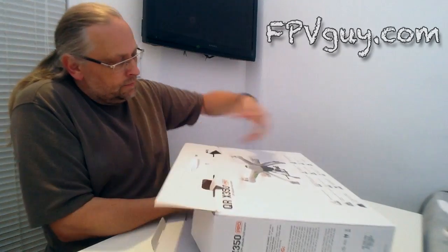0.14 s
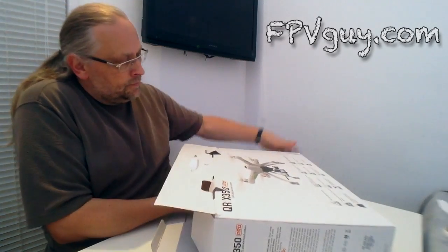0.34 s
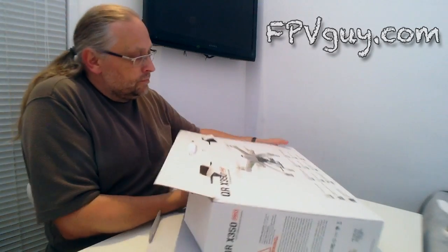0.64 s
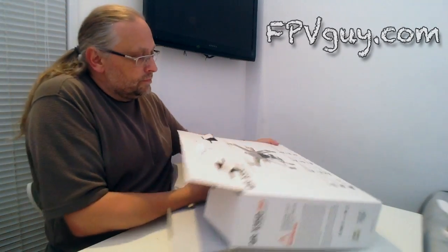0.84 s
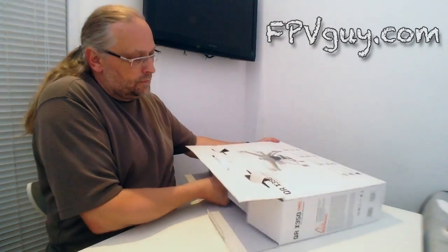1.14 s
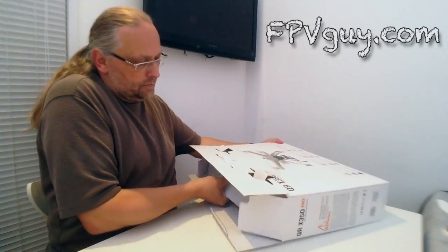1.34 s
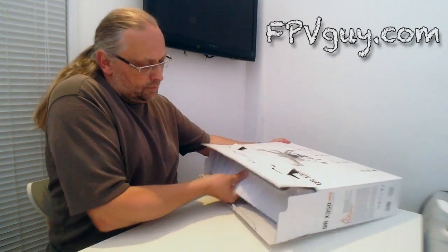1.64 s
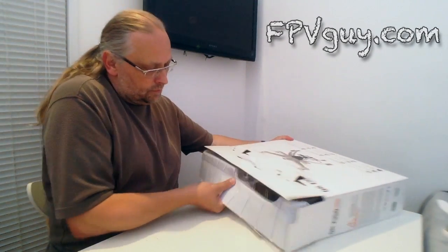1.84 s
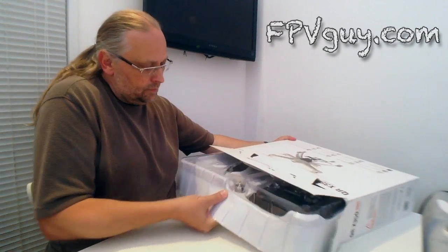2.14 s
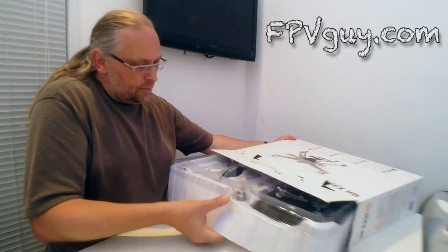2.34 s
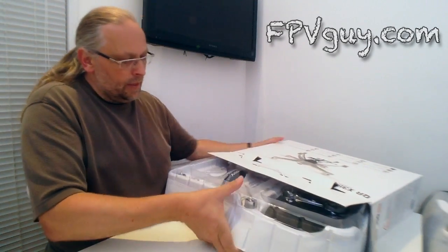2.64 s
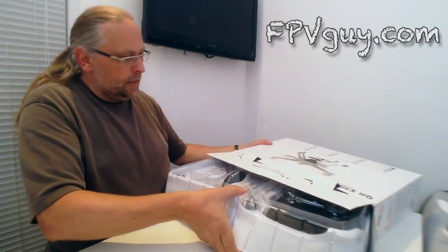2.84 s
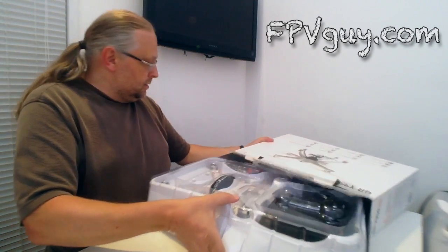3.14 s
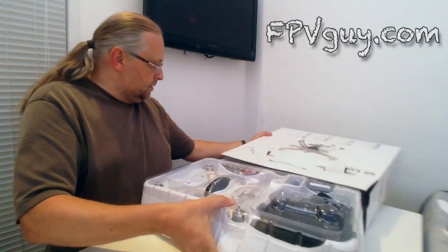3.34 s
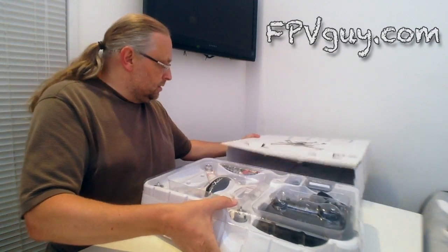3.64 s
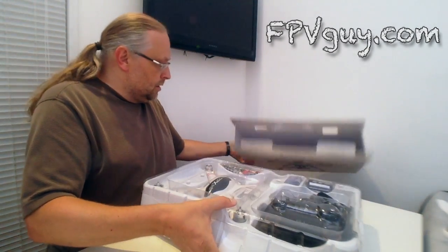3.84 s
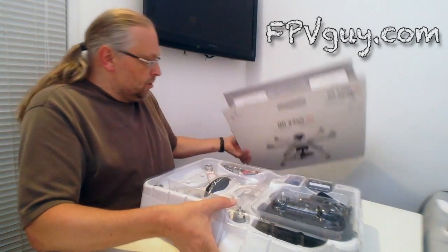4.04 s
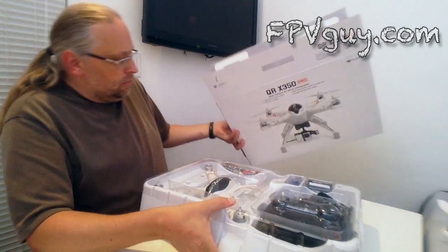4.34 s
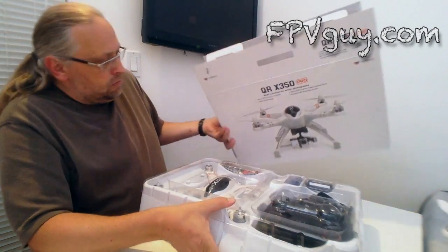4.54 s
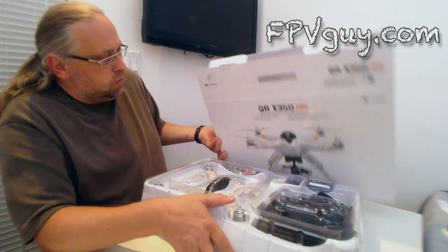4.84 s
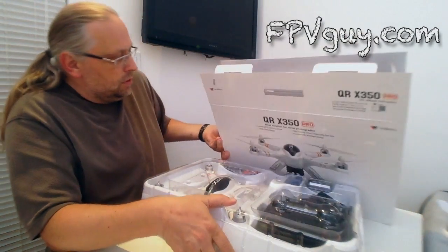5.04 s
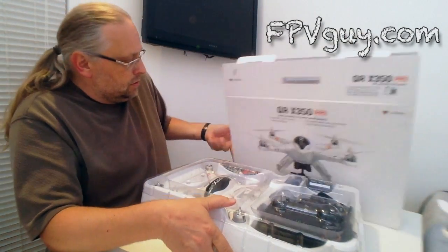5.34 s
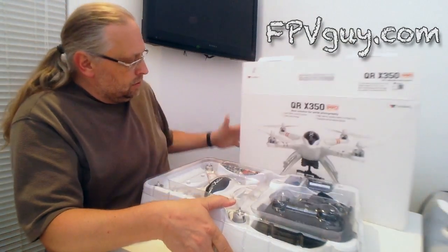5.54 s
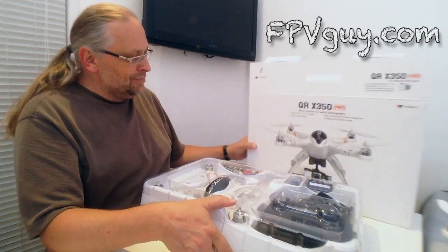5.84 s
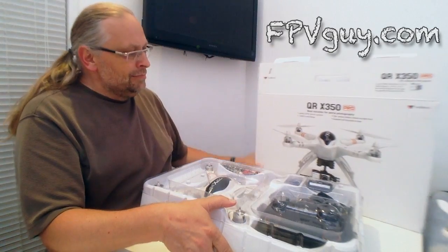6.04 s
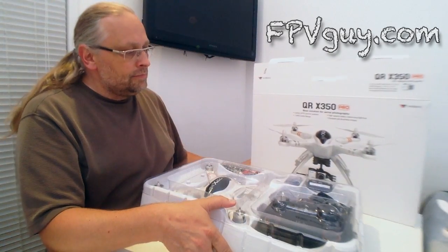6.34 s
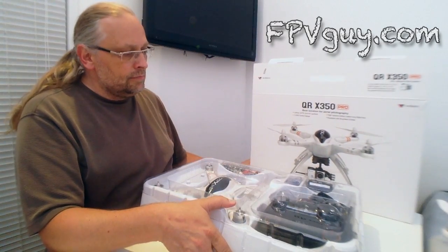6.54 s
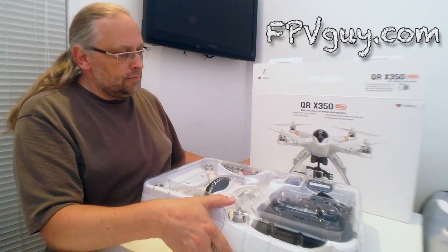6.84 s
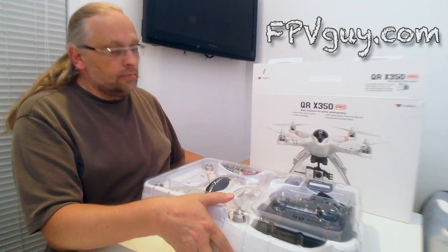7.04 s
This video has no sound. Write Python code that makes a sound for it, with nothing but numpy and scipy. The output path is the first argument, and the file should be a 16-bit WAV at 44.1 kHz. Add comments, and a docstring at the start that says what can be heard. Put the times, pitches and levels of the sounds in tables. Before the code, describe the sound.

Close unboxing sounds at a table, heard by one microphone in a bare, lightly echoing room: sharp cardboard knocks first, then a tray scraping out in two hard stick-slip drags, with snags, ticks and loud card pops. A brief lull with light brushing follows, then loud hollow box thumps, softer settling knocks, a short bright skin-on-card hiss, and finally low hum with barely audible rustles.

```python
"""A table in a small, bare room, picked up by one microphone: hands brush and knock a cardboard box.
A plastic tray is dragged out in two hard pulls; stick-slip noise rasps, hisses and drums on the hollow box.
Card catches, ringing as damped modes, and snaps and ticks in noise bursts; its walls thud as low tones.
The empty box is lifted and knocked upright on the table, and a hand slides off it in a bright hiss.
Mains hum, made of wavering tones, and shaped room noise lie under it all."""
import sys
import numpy as np
from scipy import signal
from scipy.fft import rfft, irfft, next_fast_len
from scipy.io import wavfile
from scipy.ndimage import map_coordinates

SR = 44100
rng = np.random.default_rng(int(sys.argv[2]) if len(sys.argv) > 2 else 0)


def int16_out(signal):
    """Quantize to a 16-bit WAV file."""
    q = np.round(np.clip(np.atleast_2d(signal).T, -1, 1) * 32767)
    wavfile.write(sys.argv[1], SR, q.astype(np.int16))


N = 316637

# the tray slides out of its box, levels ahead of each kind of slip's share:
# (t/s, friction level/dB, panel drumming level/dB)
TRAY_PULL = [(0.9, -53, -50), (1.12, -46.5, -37.5), (1.35, -42, -35.5), (1.57, -47, -38.5),
             (1.67, -32.5, -34), (1.77, -34.5, -29.5), (1.81, -27, -22.5), (1.9, -28.5, -33.5),
             (1.97, -25, -28.5), (2.04, -38, -33), (2.23, -39.5, -34), (2.32, -35.5, -25.5),
             (2.42, -41, -42.5), (2.6, -42, -31.5), (2.72, -41.5, -36), (2.85, -46.5, -45),
             (2.92, -44.5, -32), (3.08, -39.5, -28.5), (3.151, -27.5, -16), (3.21, -25.5, -15.5),
             (3.26, -24.5, -23.5), (3.31, -24, -18.5), (3.39, -28.5, -22), (3.441, -37, -31.5),
             (3.56, -35.5, -28), (3.72, -56, -44.5), (3.881, -57.5, -49)]


def knocks(hollow_db=2):
    """Each blow sounds into the room, and the air inside the box rings on."""
    # card and tray catch or strike; snap and edge levels are rms ahead of their envelopes:
    # (t/s, knock peak level/dB, panel f/Hz, snap level/dB, crisp edge level/dB, base panel t60/s)
    contacts = [(0.052, -20.5, 512, -42, -43, 0.018), (0.307, -23.5, 793, -42, -34.5, 0.0097),
                (0.56, -20.5, 562, -24, -25, 0.023), (0.5744, -9, 600, -8, -11.5, .029),
                (0.644, -6, 600, -8, -23.5, 0.021), (0.953, -24.5, 846, -37, -38, .035),
                (1.101, -17.5, 503, -24, -29.5, 0.041), (1.124, -15, 730, -48, -35, 0.04),
                (1.511, -21.5, 744, -36, -52, .039), (1.794, -31, 512, -33, -12.5, 0.031),
                (1.832, -18.5, 580, -22, -16, 0.024), (1.865, -14, 648, -24, -25.5, 0.043),
                (1.987, -14, 734, -40, -19, 0.02), (2.049, -17, 708, -28, -46.5, .06),
                (2.081, -17, 711, -40, -38, .08), (2.2652, -7.5, 670, -7.5, -14, 0.011),
                (2.484, -22.5, 560, -26.5, -21.5, 0.025), (2.579, -9, 575, -14.5, -25.5, 0.043),
                (2.638, -6, 644, -16, -26.5, 0.033), (2.678, -6.5, 816, -9.5, -32.5, 0.032),
                (2.937, -17.5, 940, -40, -42.5, 0.033), (3.025, -18.5, 904, -31, -48, .022),
                (3.094, -13.5, 657, -37, -26.5, 0.02), (3.118, -17, 610, -30, -34, .04),
                (3.311, -7.5, 582, -29, -27.5, 0.039), (3.563, -18.5, 467, -46, -24.5, .09),
                (4.464, -21, 407, -37, -44, 0.039), (4.707, -2.5, 517, -13.5, -25, 0.022),
                (4.75, -10.5, 605, -19, -26.5, .05), (4.981, 2, 621, -29, -25.5, 0.061),
                (4.988, -2, 739, -17.5, -27, 0.074), (5.365, -22, 610, -39, -48, 0.048),
                (5.38, -8.5, 353, -35, -38.5, .018), (5.593, -12, 320, -40, -40, 0.038),
                (5.902, -9, 392, -32, -34.5, 0.018), (5.995, -11.5, 382, -39, -32, 0.061)]
    # resonances of the air in the box: (f/Hz, width/Hz, relative level/dB)
    cavity = [(166, 9.1, 5), (289.5, 22, 1.5), (377, 7.6, -12.5), (442, 6.6, 2.5), (493, 4.1, -2.5),
              (700, 13, 2), (725, 3.5, -1.5), (874, 6.4, 1), (933, 10, 6), (1170, 7.4, -9),
              (1360, 3.2, -0.5), (1500, 21, -8.5), (1720, 58, -10), (2500, 24, -3)]
    out, blows = np.zeros(N), np.zeros(N)
    for s, *contact in contacts:
        ring, crack = blow(*contact)
        add(blows, s, ring + crack)
        add(out, s, room(ring, wet_db=-1.5) + room(crack, wet_db=-2))
    return out + amp(hollow_db) * resonate(blows, cavity)


def blow(db, hz, snap_db, edge_db, t60):
    """One contact: the ring of a well-damped panel, and the crunch of the creased card."""
    # modes of a card panel: (multiple of its pitch, relative level/dB, share of the ring time)
    panel = [(0.361, -13.5, 1.5), (.53, -3.5, 1.04), (0.693, -0.5, 0.96), (0.847, 1.5, 1.07),
             (1.001, 5.5, 0.78), (1.191, 1, 0.68), (1.419, -1, 0.62), (1.741, -10, 0.84), (2.2, -21.5, 1.2),
             (2.901, -25.5, 0.61)]
    # spectrum of the snapping card: (f/Hz, relative level/dB)
    snap_spectrum = [(250, -33), (700, 4), (1200, 14.5), (1750, 11.5), (2200, 6.5), (2650, 4.5), (3900, -2),
                     (6500, -14.5), (15000, -63.5)]
    # spectrum of the crisp edge: (f/Hz, relative level/dB)
    edge_spectrum = [(1500, -63.5), (3500, 4), (5000, 2.5), (6500, 1), (8000, 6), (9300, 1.5), (10600, -9),
                     (12500, -6), (16000, -30)]
    t = np.arange(SR // 5) / SR
    ring = np.zeros(len(t))
    for k, (ratio, level, life) in enumerate(panel):
        level_chance, pitch_chance = rng.standard_normal(2)  # no two blows excite the modes alike
        mode_hz = hz * ratio * (1 + 0.033 * pitch_chance)
        mode = np.sin(2 * np.pi * mode_hz * t) * fade(t, t60 * life)
        ring += (-1) ** k * amp(level + level_chance) * mode
    snap = crunch(t, snap_spectrum, t60=0.024, rise=0.00073)
    edge = crunch(t, edge_spectrum, t60=0.034, rise=0.00062)
    return amp(db) * ring / np.max(np.abs(ring)), amp(snap_db) * snap + amp(edge_db) * edge


def crunch(t, spectrum, t60, rise):
    """A short burst of coloured noise: fibres giving way."""
    return coloured(rng.standard_normal(len(t)), spectrum) * fade(t, t60) * (1 - np.exp(-t / rise))


def sliding():
    """Coarse slips drum on the hollow box, finer ones rasp, and the flat faces hiss."""
    # resonances of the hollow box: (f/Hz, width/Hz, relative level/dB)
    box = [(90, 52, -10), (172, 70, -3), (285.5, 57, 2.5), (373, 64, 1), (496, 91, -1), (670, 145, -2.5),
           (786, 85, 0.5), (985, 270, -7.5)]
    # spectrum of the rasp: (f/Hz, relative level/dB)
    rasp_spectrum = [(500, -32.5), (1000, -8.5), (1400, 1.5), (2200, -1), (3600, 0), (5000, -2.5),
                     (9000, -36)]
    # spectrum of the hiss: (f/Hz, relative level/dB)
    hiss_spectrum = [(2000, -38), (3700, -6), (4800, -3), (6200, 1), (7800, 5), (9000, 0.5), (10200, -7.5),
                     (12000, -2.5), (15500, -14.5)]
    drum_share_db, rasp_share_db, hiss_share_db = -0.5, -2.5, -0.5
    drum_gain, rasp_gain, hiss_gain = rubbing()
    judder = wobble(70)  # the pressure of the hand is never even
    drum = unit(resonate(slips(rate=380, smooth=0.69), box))
    rasp = coloured(slips(rate=450, smooth=1.0), rasp_spectrum)
    hiss = coloured(slips(rate=900, smooth=1.7), hiss_spectrum)
    drum *= drum_gain * amp(drum_share_db + 0.92 * judder)
    rasp *= rasp_gain * amp(rasp_share_db + 1.4 * judder)
    hiss *= hiss_gain * amp(hiss_share_db + 0.55 * judder)
    return room(drum + rasp + hiss, wet_db=-9.5)[:N]


def rubbing():
    """Gains of drumming, rasp and hiss: pull and brushes add in power; brightness trades rasp for hiss."""
    # hands, sleeves and flaps brush the card, levels ahead of each kind of slip's share:
    # (t/s, length/s, friction level/dB, brightness/dB, panel drumming level/dB)
    brushes = [(-0.03, 0.16, -43, -0.5, -36.5), (0.16, 0.24, -58, 0, -45), (0.431, 0.12, -50, -1, -38.5),
               (0.59, 0.084, -38, -4, -29.5), (0.76, 0.13, -46.5, 3, -54.5), (0.909, 0.27, -45, 4, -38.5),
               (2.417, 0.02, -39, 8, -42), (3.87, 0.12, -52, 4.5, -46), (3.97, 0.059, -43.5, 1.5, -36),
               (4.047, 0.37, -61, 1.5, -46), (4.423, 0.023, -43.5, 0, -34),
               (4.594, 0.22, -60.5, -1.5, -46.5), (4.723, 0.11, -48, 1.5, -33),
               (4.9, 0.093, -41, 0.5, -33.5), (4.99, 0.027, -50, -5.5, -21), (5.25, 0.69, -60.5, 0.5, -50),
               (5.354, 0.047, -53.5, 3, -34), (5.657, 0.2, -51.5, 2, -40.5), (5.889, 0.11, -40.5, -1, -26),
               (6.15, 0.3, -51.5, 0.5, -52.5), (6.63, 0.21, -61.5, 0.5, -52),
               (6.916, 0.38, -67.5, 0, -57.5)]
    friction_db, drum_db = curves(TRAY_PULL)
    power = amp([drum_db, friction_db, friction_db]) ** 2
    for s, length, db, bright_db, drumming_db in brushes:
        shares = amp([[drumming_db], [db - bright_db], [db + bright_db]])
        power += (shares * stroke(s, length, attack=0.031, release_db_per_s=115.5)) ** 2
    return np.sqrt(power)


def slips(rate, smooth):
    """Friction: tiny stick-slip jolts of uneven size, rate a second on average, over a smooth rub."""
    happens = rng.random(N) < rate / SR
    sizes = amp(3 * np.clip(rng.standard_normal(N), -2, 2))
    jolts = happens * rng.choice([-1, 1], N) * sizes
    return unit(unit(jolts) + smooth * rng.standard_normal(N))


def stroke(s, length, attack, release_db_per_s):
    """Gain of one stroke of the hand: it swells over the attack and dies away once length has passed."""
    t = np.arange(N) / SR - s
    swell = np.sin(np.pi / 2 * np.clip(t / attack, 0, 1)) ** 2
    return swell * amp(-release_db_per_s * np.maximum(t - length, 0))


def catches(count=30, scatter_db=2, spread_octaves=0.32):
    """The moving tray snags lightly at random moments, as hard as it is being pulled."""
    knock_over_drumming_db, snap_over_friction_db, panel_hz = -3, 0.5, 710
    out = np.zeros(N)
    times, friction, drumming = np.transpose(TRAY_PULL)
    for s in rng.uniform(times[0], times[-1], count):
        size, pitch = rng.standard_normal(2)
        knock_db = np.interp(s, times, drumming) + knock_over_drumming_db + scatter_db * size
        snap_db = np.interp(s, times, friction) + snap_over_friction_db + scatter_db * size
        hz = panel_hz * 2 ** (spread_octaves * pitch)
        ring, crack = blow(knock_db, hz, snap_db, snap_db, t60=0.027)
        add(out, s, ring + crack)
    return room(out, wet_db=-5.5)[:N]


def thuds():
    """The broad walls of the box flex: two low partials that swing and die away."""
    # a whole wall flexes: (t/s, lower partial's level ahead of its envelope/dB, f/Hz)
    wall_flexes = [(0.053, -25, 153), (0.502, -23, 96), (0.574, -18, 245), (0.953, -24, 190),
                   (1.126, -33, 126), (1.393, -29, 155), (2.267, -15, 241), (2.676, -23, 160),
                   (3.181, -16, 287), (3.842, -27.5, 120), (4.469, -32, 146), (4.709, -19, 310),
                   (4.879, -13.5, 80.5), (4.992, -9, 156), (4.996, -9.5, 90.8), (5.383, -12.5, 88),
                   (5.599, -13.5, 166), (5.718, -19.5, 121), (5.74, -19.5, 88.4), (5.905, -6.5, 85.5),
                   (5.915, -14.5, 202), (5.994, -12, 376.4)]
    out, t = np.zeros(N), np.arange(SR // 2) / SR
    envelope = fade(t, t60=0.12) * (1 - np.exp(-t / 0.0051))
    for s, db, hz in wall_flexes:
        swing = np.sin(2 * np.pi * hz * t) + 0.47 * np.sin(2 * np.pi * hz * 1.7 * t)
        add(out, s, room(amp(db) * swing * envelope, wet_db=-8.5))
    return out


def ticks(octaves=0.73):
    """Stiff edges flick past each other: brief bursts of noise around one frequency."""
    # card edges and thin plastic: (t/s, rms level ahead of the envelope/dB, centre f/Hz)
    flicks = [(0.104, -23.5, 7000), (0.453, -34, 7750), (1.327, -26.5, 7150), (1.803, -13, 7050),
              (2.32, -21, 7940), (2.345, -18.5, 7330), (2.5586, -23, 7160), (2.6772, -3.5, 2580),
              (2.9386, -19.5, 4540), (2.9823, -13.5, 3480), (3.068, -17, 3630), (4.2005, -39, 7500),
              (4.2667, -38, 8800), (4.383, -30, 8960), (4.4452, -27.5, 6700), (4.7105, -13.5, 3800),
              (4.817, -19, 3500), (4.8282, -18, 6200), (4.929, -18.5, 7600), (5.657, -17, 7400),
              (6.734, -30, 6000), (6.8724, -43, 2710), (6.9551, -44, 4500)]
    out, t = np.zeros(N), np.arange(SR // 20) / SR
    envelope = fade(t, t60=0.019) * (1 - np.exp(-t / 0.0017))
    for s, db, centre in flicks:
        def band(hz):
            """A bell on the octave scale."""
            return np.exp(-0.5 * (np.log2((hz + 1) / centre) / octaves) ** 2)
        click = unit(filtered(rng.standard_normal(len(t)), band)) * envelope
        add(out, s, room(amp(db) * click, wet_db=-7))
    return out


def swipe():
    """The hand slides off the box: dense slips of skin on glossy card, brightest near 5 kHz."""
    # spectrum of the palm on the card: (f/Hz, relative level/dB)
    palm = [(1000, -45), (2200, -5.5), (2700, -12.5), (3200, -6), (4400, -3), (4950, 7), (5400, -2.5),
            (6400, -1), (9000, -4.5), (10300, -15.5), (12800, -11.5), (15500, -34.5)]
    speed = stroke(s=5.93, length=0.14, attack=0.079, release_db_per_s=171)
    skin = coloured(slips(rate=5900, smooth=0.97), palm)
    return skin * speed * amp(-25 + 0.72 * wobble(70))


def background():
    """Room noise and an electrical hum of tones that waver in level and phase."""
    # mains hum; the two lowest tones beat: (f/Hz, rms level about which it wavers/dB)
    hum_tones = [(55.2, -64), (59.2, -49.5), (118.4, -61), (236.9, -57.5)]
    # spectrum of the room noise: (f/Hz, relative level/dB)
    air = [(25, -20.5), (38, 2), (55, 3), (80, -5), (130, -2), (200, -7.5), (300, -11.5), (600, -17.5),
           (1000, -30.5), (2000, -30), (4000, -66), (8000, -32), (11000, -53.5), (15500, -47.5)]
    t = np.arange(N) / SR
    hum = np.zeros(N)
    for hz, db in hum_tones:
        gain = np.sqrt(2) * amp(db + 1.5 * wobble(7.3))
        hum += gain * np.sin(2 * np.pi * hz * t + 0.4 * wobble(6.5))
    return hum + amp(-50.5) * coloured(rng.standard_normal(N), air)


def room(x, wet_db, gap=0.0017):
    """x and the answer of the walls: a fresh noise tail each call, decaying at its own pace per frequency."""
    # decay of the bare room: (f/Hz, t60/s)
    walls = [(80, 0.65), (210, 0.32), (560, 0.43), (1500, 0.56), (4000, 0.25), (8000, 0.43), (15000, 0.26)]
    hz, t, z = signal.stft(rng.standard_normal(SR * 3 // 4), SR, nperseg=256)
    decay = 1e-3 ** (t / along(walls, hz)[:, None])
    tail = signal.istft(z * decay, SR, nperseg=256)[1]
    # the reflections build up over about gap seconds
    tail = tail * (1 - np.exp(-(np.arange(len(tail)) / SR / gap) ** 2))
    answer = amp(wet_db) * tail / np.linalg.norm(tail)
    answer[0] += 1  # the direct sound
    return signal.fftconvolve(x, answer)


def resonate(x, modes):
    """x through a bank of (f/Hz, width/Hz, level/dB) resonances of alternating sign."""
    def response(f):
        """Sum of the band-pass resonances."""
        total = 0
        for k, (centre, width, db) in enumerate(modes):
            damping = 1j * f * width
            total = total + (-1) ** k * amp(db) * damping / (centre * centre - f * f + damping)
        return total
    return filtered(x, response)


def amp(db):
    """Decibels to gain."""
    return 10 ** (np.asarray(db) / 20)


def unit(x):
    """x at rms 1."""
    return x / np.sqrt(np.mean(x ** 2) + 1e-20)


def along(points, hz):
    """(f/Hz, value) points read on a log frequency axis."""
    f, v = np.transpose(points)
    return np.interp(np.log(hz + 1), np.log(f + 1), v)


def curves(rows, rest_db=-120):
    """One level per sample for each column after the time; rest_db outside the rows."""
    s, *cols = np.transpose(rows)
    return [np.interp(np.arange(N) / SR, s, c, left=rest_db, right=rest_db) for c in cols]


def fade(t, t60):
    """Exponential decay that loses 60 dB in t60 seconds."""
    return np.exp(-np.log(1000) * t / max(t60, 1e-4))


def wobble(rate):
    """A smooth random curve, rate knots a second."""
    knots = rng.standard_normal(8192)
    return map_coordinates(knots, [np.arange(N) * rate / SR], mode="wrap")


def filtered(x, response):
    """x times a response of frequency, padded so that tails have room to die."""
    m = next_fast_len(len(x) + 8192)
    return irfft(rfft(x, m) * response(np.fft.rfftfreq(m, 1 / SR)), m)[:len(x)]


def coloured(x, spectrum):
    """x filtered by a spectrum, at rms 1."""
    return unit(filtered(x, lambda hz: amp(along(spectrum, hz))))


def add(track, s, sound):
    """Mix a sound into the track at s seconds."""
    part = track[max(round(s * SR), 0):][:len(sound)]
    part += sound[:len(part)]


def scene():
    """Everything at one microphone."""
    box_and_tray = knocks() + sliding() + catches() + thuds() + ticks()
    return (box_and_tray + swipe() + background())[None]


def record(dry):
    """The microphone sheds deep rumble, the hardest knocks flatten, and nothing passes above the band limit."""
    rumble_hz, top_hz = 46, 15450
    lean = signal.sosfilt(signal.butter(4, rumble_hz, "highpass", fs=SR, output="sos"), dry[0])
    held = lean / (1 + np.abs(lean) ** 8) ** (1 / 8)  # bends only close to full scale
    return filtered(held, lambda hz: hz < top_hz)[None]


dry = scene()
out = record(dry)
int16_out(out)
```